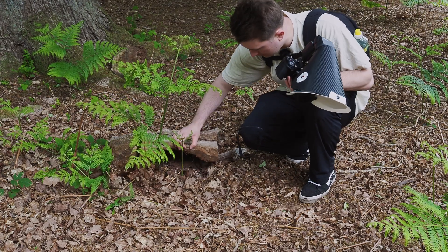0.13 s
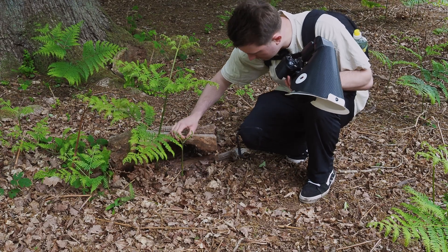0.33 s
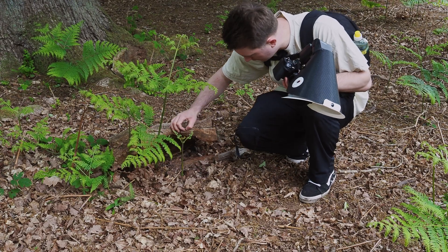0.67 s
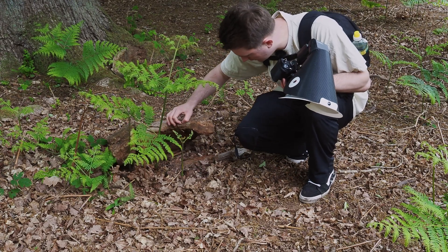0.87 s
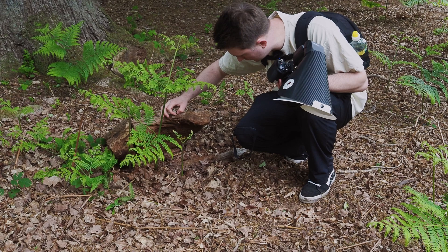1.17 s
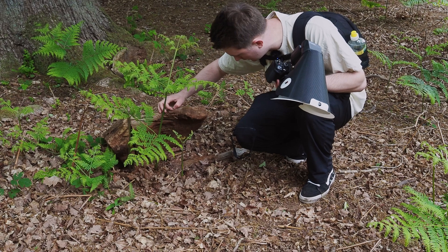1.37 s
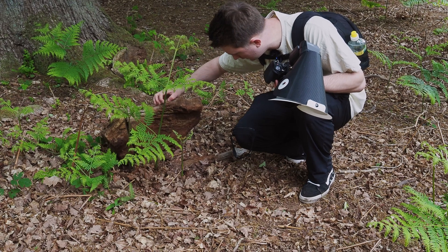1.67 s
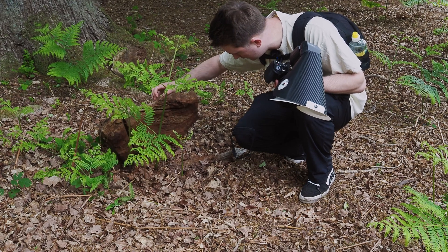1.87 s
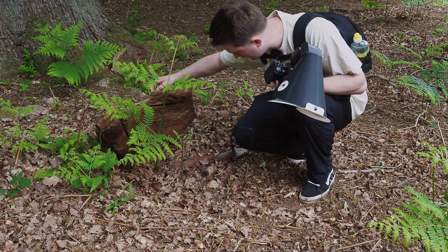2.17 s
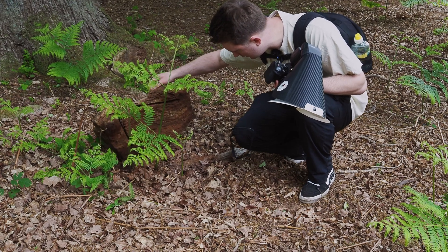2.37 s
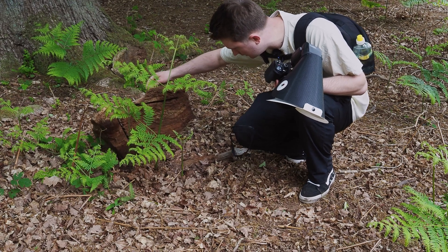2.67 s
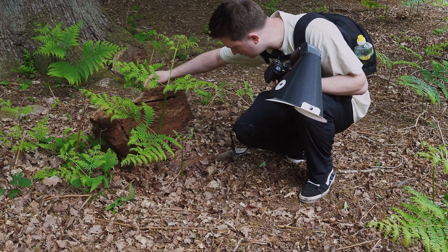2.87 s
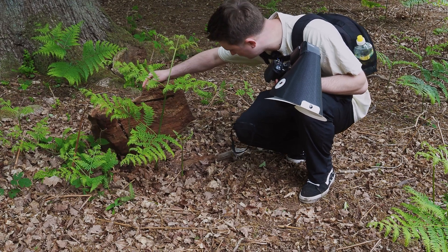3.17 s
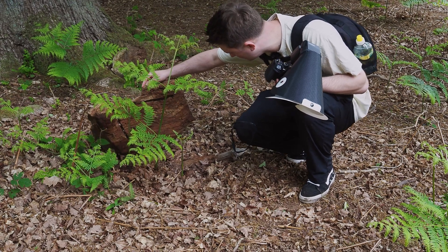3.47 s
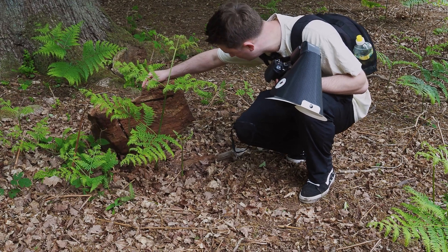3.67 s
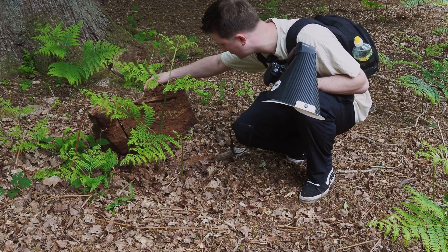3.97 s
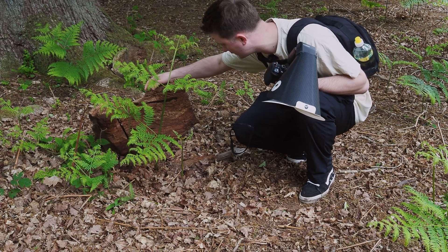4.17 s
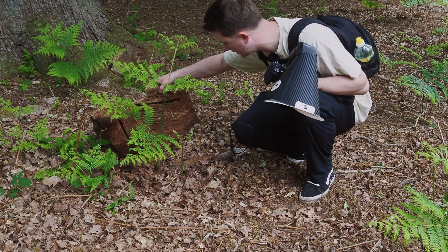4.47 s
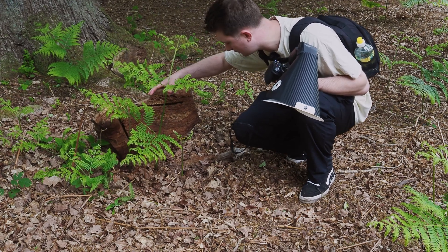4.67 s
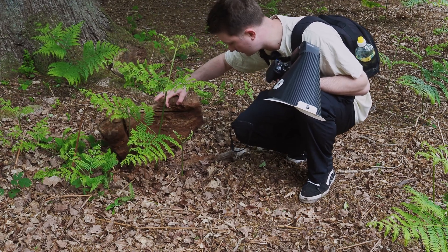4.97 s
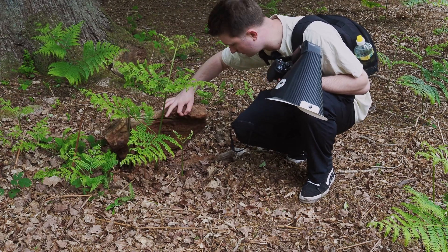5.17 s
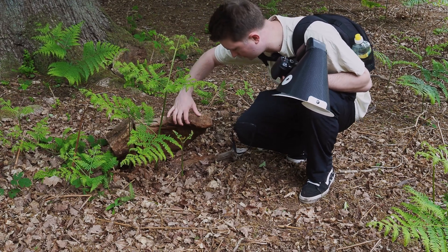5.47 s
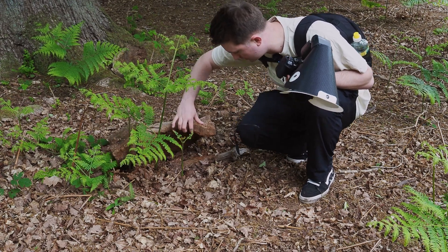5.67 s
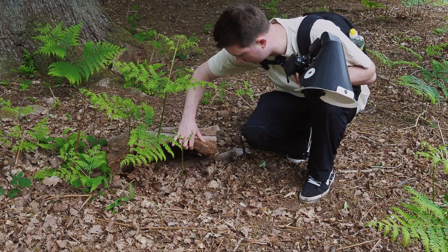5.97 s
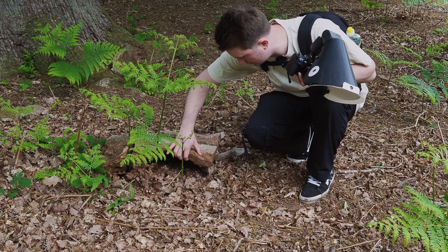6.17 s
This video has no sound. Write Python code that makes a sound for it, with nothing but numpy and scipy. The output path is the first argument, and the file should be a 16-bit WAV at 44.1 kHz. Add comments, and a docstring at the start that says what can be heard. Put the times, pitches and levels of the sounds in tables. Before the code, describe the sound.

A close, nearly mono outdoor sound of about 6.3 seconds in a quiet wood, with a faint low rumble of open air. At 0 s a rotten log tears out of dry leaf litter: strong crisp rustle, hollow woody scraping, a sharp snap at 0.1 and soft bumps near 0.5. From 0.7 to 1.8 the rustle is lighter, with crumbs and many small twig snaps. Between 1.85 and 2.2 brittle cracks bunch together, the loudest at about 2.2. Thinner ticking follows, then a bright swish of leaves and fronds around 3 to 3.5. Near 4 it almost stops. From 4.5 the log is lowered: rustle swells to 5, snaps at 4.8, 5.2 and 5.6, a hollow drag near 5.4, then a final leafy crunch and dull knock around 6 to 6.2. Faint, thin bird whistles glide far off, mostly from 1.2 to 4.4 and again at 5.7.

```python
"""A rotten log turned in leaf litter

A rotten log is rolled up out of dry leaf litter in a wood, held a moment, and lowered back.
Litter and crumbling wood are clouds of damped grains, mixed with noise, that follow the log's motion and lift.
Snapping twigs and fibres are runs of ticks through a resonance; scrapes and knocks excite the hollow log's modes.
Far birds are gliding sines with a diffuse tail and the open air is shaped noise.
The image is nearly mono, with a faint diffuse stereo width in the bass and treble."""
import sys
import numpy as np
from scipy import signal
from scipy.fft import rfft, irfft, next_fast_len
from scipy.io import wavfile
from scipy.ndimage import map_coordinates

SR = 44100
rng = np.random.default_rng(int(sys.argv[2]) if len(sys.argv) > 2 else 0)


def pcm_store(signal):
    """Save signal as 16-bit PCM."""
    levels = np.round(np.clip(np.atleast_2d(signal), -1, 1) * 32767)
    wavfile.write(sys.argv[1], SR, levels.astype(np.int16).T)


N = 278785  # length [samples]

# Spectrum of the open air: (frequency [Hz], relative density [dB per Hz])
AIR_SPECTRUM = [(20, -36), (32, -16), (45, -4.5), (62, 4), (105, 3), (160, 2.5), (350, -1.5), (550, -15),
                (900, -9), (1700, -20), (3000, -17), (5500, -50), (9000, -27), (16000, -30)]
# Distant bird notes: (time [s], length [s], start pitch [Hz], end pitch [Hz], level before a common gain [dB])
BIRD_NOTES = [(1.25, 0.15, 5100, 4940, -60), (1.374, 0.037, 4440, 4380, -40.5),
              (1.569, .05, 4400, 4370, -47), (1.66, 0.34, 7460, 7300, -55), (1.707, 0.15, 4380, 4370, -46),
              (2.532, 0.057, 4400, 4330, -50), (2.774, 0.036, 4350, 4280, -47),
              (3.169, 0.052, 5440, 4300, -39), (3.537, 0.029, 5200, 4340, -45),
              (3.598, 0.074, 2500, 2710, -47), (3.734, 0.067, 4270, 4330, -49),
              (3.752, 0.041, 3090, 3000, -48), (3.844, .057, 6400, 6300, -61),
              (4.247, .15, 6850, 6750, -64), (5.67, 0.11, 7650, 7050, -52)]
# Bumps of the log on the ground: (time [s], peak level before echoes [dB])
LOG_KNOCKS = [(0.108, -25), (0.452, -26), (0.585, -25.5), (1.512, -28.5), (1.884, -28.5), (2.173, -28),
              (3.221, -28), (4.182, -36.5), (4.774, -30.5), (5.233, -30.5), (5.634, -26.5), (6.158, -23.5)]
# Modes of the hollow log: (frequency [Hz], bandwidth [Hz], level [dB])
LOG_MODES = [(249, 150, -6.5), (319.7, 90, -0.5), (390.4, 100, -2), (473, 276, -15)]
# Loud breaks of twigs and fibres: (time [s], crack rms over 10 ms [dB], pitch [Hz], tearing time scale [s],
# woody body against the crack before a common trim [dB])
LOUD_SNAPS = [(0.0829, -25.5, 3720, .0032, -13), (0.1085, -36, 4000, .0069, 2),
              (0.2516, -30, 3680, 0.0091, -8), (0.3429, -30, 3800, 0.0018, -9),
              (0.534, -31.5, 3300, 0.00053, -5), (0.5871, -44, 2900, 0.0023, 9),
              (0.7654, -35, 3900, 0.0019, -5), (0.892, -32.5, 2780, 0.0039, -2),
              (0.8162, -37, 3650, 0.0029, 4.5), (0.9316, -32, 3020, 0.0012, -3.5),
              (1.002, -34, 3700, 0.0037, -0.5), (1.0853, -46, 2900, 0.001, 13),
              (1.1515, -27.5, 3920, 0.019, -4), (1.3755, -35, 4130, .0008, -5),
              (1.518, -44.5, 3200, .0005, 10.5), (1.5489, -28.5, 3900, 0.0024, -8),
              (1.5764, -45, 3600, .0026, 11.5), (1.6938, -32, 4220, 0.0025, -7),
              (1.834, -31, 3130, 0.00084, -7), (1.8853, -26.5, 3170, 0.0062, -6),
              (1.93, -32.5, 4000, 0.0014, -21), (1.9663, -26.5, 4870, 0.0017, -6.5),
              (1.9928, -22, 4700, .00093, -12.5), (2.0157, -29, 3800, 0.0056, -12),
              (2.03, -25, 3300, 0.0016, -19), (2.073, -21, 3540, .00016, -13),
              (2.1781, -18.5, 4200, 0.0024, -6.5), (2.605, -34.5, 3600, 0.00064, -1),
              (2.6513, -37.5, 4150, 0.0022, -18), (2.7204, -33, 4000, 0.00057, -16),
              (2.9122, -29, 4700, .003, -34), (2.9846, -29.5, 5300, 0.00052, -10),
              (3.2242, -31, 4200, 0.003, -1.5), (3.3684, -36, 4680, 0.00041, -25),
              (3.4213, -31.5, 4100, 0.002, -7), (3.525, -33.5, 4430, 0.0021, -14),
              (3.6932, -27.5, 3100, 0.0011, -11.5), (4.0163, -42, 3320, 0.0064, -7),
              (4.1844, -33.5, 3230, 0.0037, -8), (4.295, -33.5, 3650, 0.00084, -13),
              (4.353, -37, 2730, 0.00019, -10), (4.6202, -33, 3600, .0014, -34),
              (4.5342, -32.5, 3250, 0.00028, -25), (4.7805, -27, 3320, 0.0042, -8),
              (4.947, -31, 4550, 0.0023, 0), (5.1763, -27, 3680, 0.0049, -6),
              (5.2477, -37.5, 3700, 0.00093, 4), (5.261, -38.5, 3220, 0.0014, 0),
              (5.291, -28, 3750, 0.0052, -8), (5.6348, -27, 3520, 0.011, -11),
              (5.6399, -28, 4030, .0084, -10)]
# Colouring by leaves and crumbs: (frequency [Hz], response [dB])
LITTER_RESPONSE = [(450, 18.5), (610, 4), (800, -1.5), (1230, -1), (1800, -2.5), (2350, -3), (3050, 3.5),
                   (3500, 1), (4400, 1), (5300, -2), (8600, -15), (11800, -19), (14000, -23.5),
                   (15800, -29)]
# How hard the moving log stirs the litter: (time [s], leaf rustle level [dB])
LOG_MOTION = [(0, -32.5), (0.3, -35.5), (0.56, -37), (0.68, -43.5), (1.3, -42.5), (2.0, -40.5), (2.15, -42),
              (2.62, -41.5), (3.05, -35), (3.25, -37), (3.33, -42), (3.86, -45), (3.99, -55), (4.12, -50),
              (4.22, -46.5), (4.55, -38.5), (5.0, -36.5), (5.54, -43.5), (5.92, -38.5), (6.0, -34),
              (6.16, -35.5), (6.26, -40.5)]
# Short shoves of the hand: (time [s], extra level [dB])
HAND_SHOVES = [(0.83, 3.5), (1.56, 0.5), (1.68, 1), (1.88, 2.5), (3.46, 6), (5.24, 0.5), (5.64, 5),
               (5.84, 3)]
# How far the log is rolled up: (time [s], lift [0 lying to 1 on edge])
LOG_LIFT = [(0, 0.29), (0.55, 0.0069), (1.3, 0.11), (2.4, 0.25), (3.1, 0.49), (3.45, 0.78), (4.3, 0.68),
            (5.0, 0.54), (5.45, 0.082), (5.8, 0.091), (6.32, 0.26)]
# Fine fern fronds sound brighter than broad dead leaves: (time [s], upper rustle gain [dB])
FROND_GAIN = [(0, -0.5), (1.0, 2.5), (3.7, 3.5), (4.2, -2), (5.6, -3.5), (6.32, 6.5)]
# Stereo width: (frequency [Hz], side against mid [dB])
SIDE_RESPONSE = [(30, -1), (120, -31), (300, -21), (1000, -33), (3000, -129), (5500, -65), (8500, -25.5),
                 (12000, -10.5)]

TOP_HZ = 15950  # band limit of the recorder
SHOVE_S = 0.036  # half length of a shove, to 1/e of its dB swell
# trill of the highest bird notes: rate, share of the pitch, start pitch above which it applies
TRILL_HZ, TRILL_DEPTH, TRILL_ABOVE_HZ = 68.3, 0.029, 6000
# layers against the leaf rustle: with the log lying, and what is lost with it on edge
SCRAPE_DB, SCRAPE_LIFT_DB = -2, 16
CRUMB_DB, CRUMB_LIFT_DB = 0, 10
SOIL_DB, SOIL_LIFT_DB = -13, 10
# crisp rims against the leaf rustle, and their gain while the log tears free
EDGE_DB, EDGE_TEAR_DB = -16.5, 6.5
TEAR_FREE_S, TEAR_FADE_S = 0.33, 0.2  # when that gain starts to fade, and for how long
TURN_S, TURN_LENGTH_S = 4.7, 0.63  # the change to the way down
DOWN_SCRAPE_DB, DOWN_CRUMB_DB = 1, -1.5  # coming down it drags more and crumbles less
# one hollow note stands out of the scrape late in the descent: level, pitch, centre, half length
DRAG_DB, DRAG_HZ, DRAG_S, DRAG_HALF_S = -3.5, 400, 5.44, 0.24
# small random fibres: density, central pitch, central tearing time scale
FIBRES_PER_S, FIBRE_HZ, FIBRE_TEAR_S = 20, 3600, 0.0011
# their level at average motion, its scatter, and dB gained per dB of motion
FIBRE_DB, FIBRE_SPREAD_DB, FIBRE_FOLLOW = -40, 1.5, 0.6
FIBRE_BODY_DB, FIBRE_LIFT_DB = 0, 19  # body before the common trim, log lying; what is lost on edge


def amp(db):
    """Decibel law: level to amplitude ratio."""
    return 10 ** (np.asarray(db) / 20)


def unit(x):
    """Normalisation by mean power: rms 1."""
    return x / np.sqrt(np.mean(x ** 2) + 1e-20)


def along(points, hz):
    """Linear interpolation of (Hz, value) points on a logarithmic frequency axis."""
    f, v = np.transpose(points)
    return np.interp(np.log(hz + 1), np.log(f + 1), v)


def curves(rows):
    """Linear interpolation in time: one curve for each column after the time."""
    s, *cols = np.transpose(rows)
    return [np.interp(np.arange(N) / SR, s, c) for c in cols]


def wobble(rate):
    """Band-limited randomness: a spline through random knots, rate of them a second."""
    knots = rng.standard_normal(int(N * rate / SR) + 4)
    return map_coordinates(knots, [np.arange(N) * rate / SR])


def ramp(start_s, length_s):
    """Linear transition from 0 to 1 over length_s."""
    return np.clip((np.arange(N) / SR - start_s) / length_s, 0, 1)


def filtered(x, response):
    """Linear filtering: the spectrum of x times a complex response of frequency."""
    n = x.shape[-1]
    m = next_fast_len(n + 4096)
    return irfft(rfft(x, m) * response(np.fft.rfftfreq(m, 1 / SR)), m)[..., :n]


def band(x, lo_hz, hi_hz, order=3):
    """Causal Butterworth band-pass filtering."""
    edges_hz = [lo_hz, min(hi_hz, SR / 2 - 1)]
    return signal.sosfilt(signal.butter(order, edges_hz, "band", fs=SR, output="sos"), x)


def resonance(f, hz, width):
    """Damped oscillator: the response of one mode."""
    return 1j * f * width / (hz * hz - f * f + 1j * f * width)


def hollow(x):
    """Modal superposition: x rung through the log's modes, with alternating signs."""
    def response(f):
        return sum((-1) ** k * amp(db) * resonance(f, hz, w) for k, (hz, w, db) in enumerate(LOG_MODES))
    return filtered(x, response)


def add(track, s, sound):
    """Linear superposition: mix a sound into a track at time s."""
    i = max(round(s * SR), 0)
    track[i:i + len(sound)] += sound[:N - i]


def echoes(x, t60, wet_db):
    """Diffuse reverberation: x plus its convolution with decaying noise."""
    t = np.arange(int(t60 * SR)) / SR
    tail = rng.standard_normal(len(t)) * amp(-60 * t / t60)
    return x + amp(wet_db) * signal.fftconvolve(x, tail / np.linalg.norm(tail))[:len(x)]


def grains(rate, lo_hz, hi_hz, life, spread_db, size=128):
    """Granular fracture: many tiny damped rings of random time, pitch and strength; rms 1."""
    when, pitch, phase, a, b, c = rng.random((int(rate * N / SR), 6)).T
    t = np.arange(size) / SR
    strength = amp(spread_db * 2 * (a + b + c))  # bell-shaped in dB
    hz = lo_hz + (hi_hz - lo_hz) * pitch
    waves = np.sin(2 * np.pi * (hz[:, None] * t + phase[:, None]))
    rings = strength[:, None] * np.exp(-t / life) * waves
    at = (when * N).astype(int)[:, None] + np.arange(size)
    return unit(np.bincount(at.ravel(), rings.ravel(), N)[:N])


def air():
    """Broadband ambient noise: low rumble and faint hiss of the open wood, slowly wavering."""
    noise = filtered(rng.standard_normal(N), lambda f: amp(along(AIR_SPECTRUM, f)))
    return amp(-51.0 + 0.3 * wobble(2.1)) * unit(noise)


def birds():
    """Frequency modulation: thin gliding whistles, the highest trilled, smeared by the trees."""
    out, waver = np.zeros(N), 1 + 0.0083 * wobble(200)
    for s, length, start_hz, end_hz, db in BIRD_NOTES:
        u = np.linspace(0, 1, int(length * SR))
        hz = (start_hz + (end_hz - start_hz) * u) * waver[int(s * SR):][:len(u)]
        if start_hz > TRILL_ABOVE_HZ:
            hz = hz * (1 + TRILL_DEPTH * np.sin(2 * np.pi * TRILL_HZ * length * u))
        swell = np.sqrt(np.abs(np.sin(np.pi * u)))
        whistle = np.sin(2 * np.pi * np.cumsum(hz) / SR)
        add(out, s, amp(db + 4.5) * swell * whistle)
    return echoes(out, t60=0.7, wet_db=-1)


def knocks():
    """Impact excitation of modes: soft, crumbling blows of decaying noise ring the hollow log."""
    out, t = np.zeros(N), np.arange(SR // 8) / SR
    for s, db in LOG_KNOCKS:
        impact = rng.standard_normal(len(t)) * amp(-60 * t / 0.054)
        blow = band(hollow(impact), 73, 1500, order=2)
        add(out, s, amp(db) * blow / np.abs(blow).max())
    return out


def motion():
    """Motion as a level curve in dB, with each shove a brief Gaussian swell."""
    t = np.arange(N) / SR
    swells = sum(db * np.exp(-((t - s) / SHOVE_S) ** 2) for s, db in HAND_SHOVES)
    return curves(LOG_MOTION)[0] + swells


def fibres():
    """Random fracture: rows like the loud snaps, louder with motion, thinner as the log lifts."""
    count = int(FIBRES_PER_S * N / SR)
    when, a, b, pitch, tear = rng.random((count, 5)).T
    at = ((np.arange(count) + when) * N / count).astype(int)  # one in each equal slot
    motion_db, lift = motion(), curves(LOG_LIFT)[0]
    follow_db = FIBRE_FOLLOW * (motion_db[at] - motion_db.mean())
    db = FIBRE_DB + follow_db + FIBRE_SPREAD_DB * 2 * (a - b)
    hz = FIBRE_HZ * 2 ** (0.6 * (pitch - 0.5))
    tearing = FIBRE_TEAR_S * 2 ** (3 * (tear - 0.5))
    return list(zip(at / SR, db, hz, tearing, FIBRE_BODY_DB - FIBRE_LIFT_DB * lift[at]))


def over_10_ms(x):
    """Energy normalisation: rms 1 if all the energy fell within 10 ms."""
    return x * np.sqrt(SR / 100 / np.sum(x ** 2))


def snaps():
    """Brittle fracture: fibres give way in a quick run of ticks that ring the twig and thump the wood."""
    out, t = np.zeros(N), np.arange(SR // 20) / SR
    for s, db, hz, tearing, body_db in list(LOUD_SNAPS) + fibres():
        # a tear gathers, then lets go
        run = np.exp(-(t / (1.66 * tearing)) ** 2) * (1 - 0.35 * np.exp(-2 * t / tearing))
        ticks = run * rng.standard_normal(len(t)) * (rng.random(len(t)) < 12000 / SR)
        ticks[0] = 2.9 * np.exp(-tearing / 0.015)  # the first break, weaker in a slow tear
        ticks = echoes(ticks, t60=0.025, wet_db=-12)
        twig = filtered(ticks, lambda f: resonance(f, hz, 1650))
        splinter = amp(-3.5 - 0.22 * (db + 54.0))  # thick twigs break louder and duller than thin fibres
        crack = over_10_ms(band(twig, 2330, 6500) + splinter * band(twig, 7870, 17300, order=2))
        body = over_10_ms(band(ticks, 696, 1670, order=2))
        add(out, s, amp(db) * (crack + amp(body_db - 1.0) * body))
    return out


def rustle():
    """Stick-slip friction: the log slips in jerks that crush leaves, grind crumbs and scrape hollow wood."""
    leaf_db = motion()
    lift, = curves(LOG_LIFT)
    frond_db, = curves(FROND_GAIN)
    down = ramp(TURN_S, TURN_LENGTH_S)
    tearing = 1 - ramp(TEAR_FREE_S, TEAR_FADE_S)
    scrape_db = leaf_db + SCRAPE_DB - SCRAPE_LIFT_DB * lift + DOWN_SCRAPE_DB * down
    soil_db = leaf_db + SOIL_DB - SOIL_LIFT_DB * lift + DOWN_SCRAPE_DB * down
    crumb_db = leaf_db + CRUMB_DB - CRUMB_LIFT_DB * lift + DOWN_CRUMB_DB * down
    edge_db = leaf_db + EDGE_DB + EDGE_TEAR_DB * tearing
    jerks = amp(1.1 * wobble(50) + 1.5 * wobble(170))

    def litter(x, lo, hi):
        """Spectral shaping: jerked x coloured by the litter, within one band; rms 1."""
        coloured = filtered(x * jerks, lambda f: amp(along(LITTER_RESPONSE, f)))
        return unit(band(coloured, lo, hi, order=4))

    # sharp breaks
    crackle = grains(rate=900, lo_hz=1500, hi_hz=16200, life=0.00009, spread_db=-1.0)
    # leaf blades flick and ring briefly
    blades = grains(rate=1500, lo_hz=1910, hi_hz=9530, life=0.00057, spread_db=2.0)
    # stiff stalks tick with a clearer pitch
    stalks = grains(rate=170, lo_hz=716, hi_hz=7200, life=0.0013, spread_db=4.0, size=256)
    crumbs = grains(rate=1000, lo_hz=427, hi_hz=2785, life=0.0017, spread_db=-1, size=256)
    # crisp rims chip off
    edges = grains(rate=2000, lo_hz=7480, hi_hz=16900, life=0.0019, spread_db=2.0)
    # leaves slide over each other; under a hard push the single crackles merge into a rush
    brush = amp(np.minimum(leaf_db + 34, 0) / 2) * rng.standard_normal(N)

    leaves = litter(blades + 1.2 * crackle + 0.6 * stalks + brush, 2300, 8000)
    upper = filtered(leaves, lambda f: 1 - 1 / (1 + (f / 4500) ** 8))
    leaves = leaves + (amp(frond_db) - 1) * upper
    crumbling = litter(crumbs + 0.32 * stalks + brush, 690, 2510)
    rims = litter(edges + 0.85 * crackle + 0.76 * brush, 8350, 19300)

    rubs = grains(rate=600, lo_hz=101, hi_hz=760, life=0.00058, spread_db=3.5)
    scrape = unit(band(hollow(rubs), 140, 700, order=2))
    drag = unit(filtered(scrape, lambda f: resonance(f, DRAG_HZ, 86)))
    dragging = np.exp(-((np.arange(N) / SR - DRAG_S) / DRAG_HALF_S) ** 2)
    scrape = (1 - 0.17 * dragging) * scrape + amp(DRAG_DB + 1.1 * wobble(25)) * dragging * drag
    soil = unit(band(rng.standard_normal(N) * jerks, 93, 316, order=2))  # dull shifting

    return (amp(scrape_db) * scrape + amp(soil_db) * soil + amp(crumb_db) * crumbling
            + amp(leaf_db) * leaves + amp(edge_db) * rims)


def scene():
    """Mid-side superposition: a nearly mono image, with a faint diffuse width in the bass and treble."""
    mid = echoes(rustle() + snaps() + knocks(), t60=0.32, wet_db=-15.5) + birds() + air()
    t = np.arange(SR // 8) / SR
    tail = rng.standard_normal(len(t)) * amp(-60 * t / 0.59)
    diffuse = signal.fftconvolve(mid, tail / np.linalg.norm(tail))[:N]
    side = filtered(diffuse, lambda f: amp(along(SIDE_RESPONSE, f)))
    return np.array([mid + side, mid - side])


def record(dry):
    """Band limitation: the recorder keeps nothing above its limit."""
    return filtered(dry, lambda hz: hz < TOP_HZ)


dry = scene()
out = record(dry)
pcm_store(out)
```